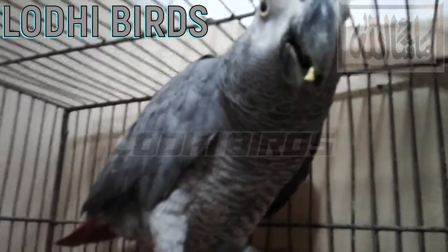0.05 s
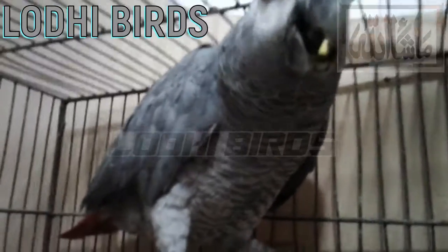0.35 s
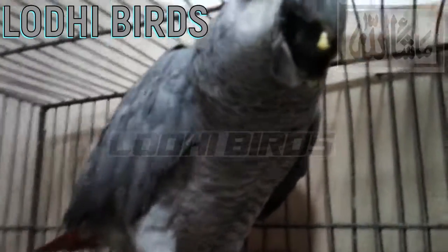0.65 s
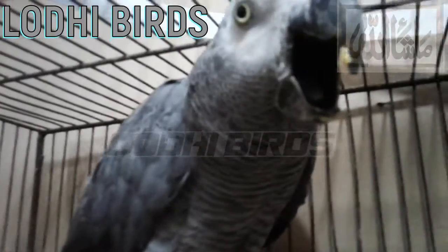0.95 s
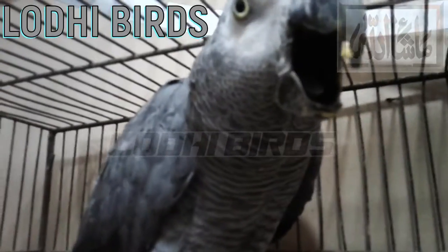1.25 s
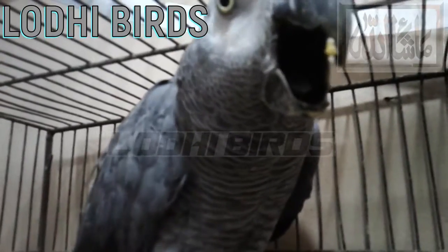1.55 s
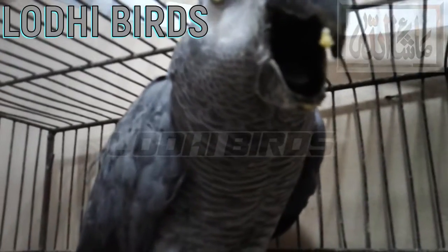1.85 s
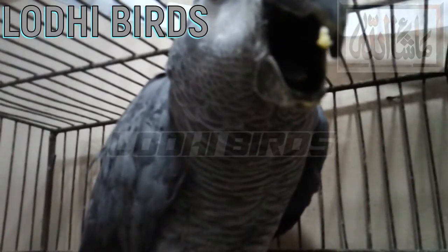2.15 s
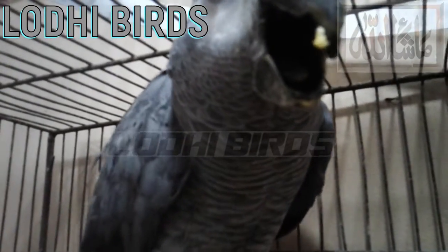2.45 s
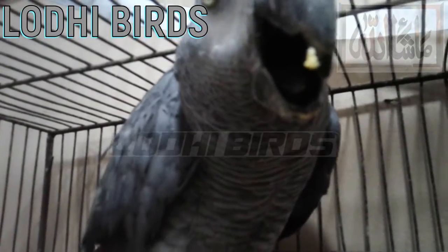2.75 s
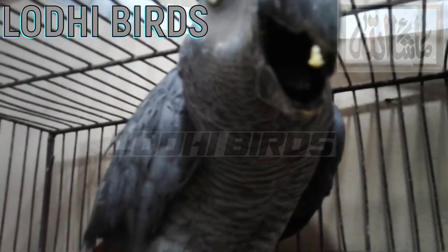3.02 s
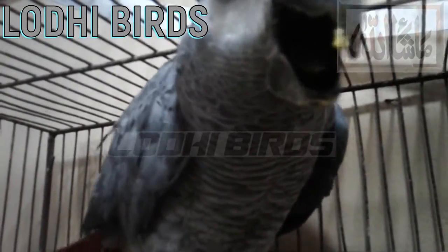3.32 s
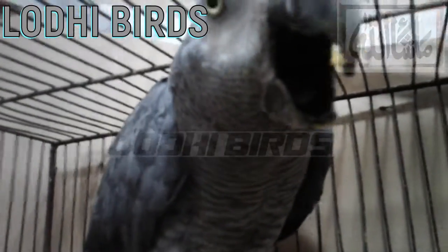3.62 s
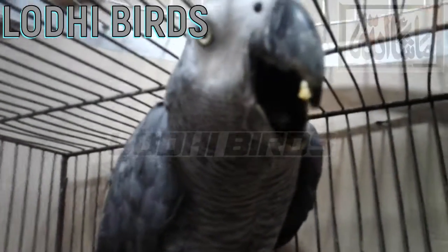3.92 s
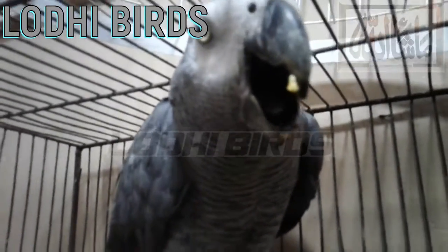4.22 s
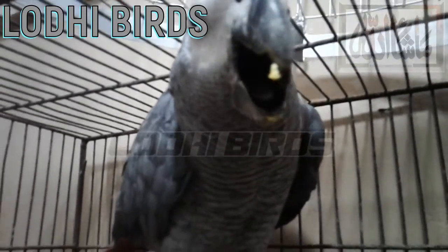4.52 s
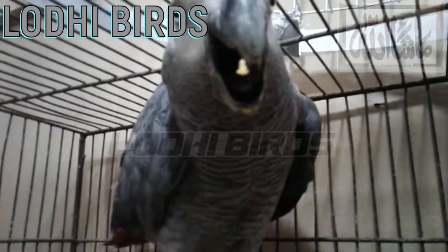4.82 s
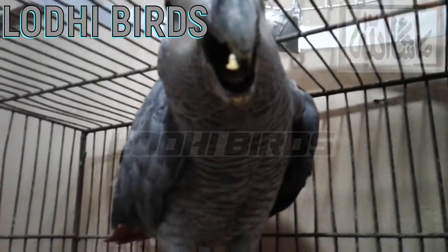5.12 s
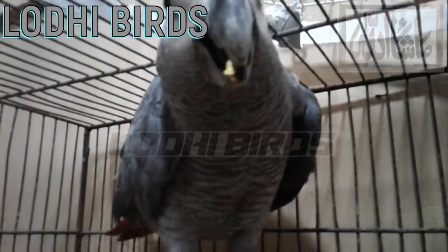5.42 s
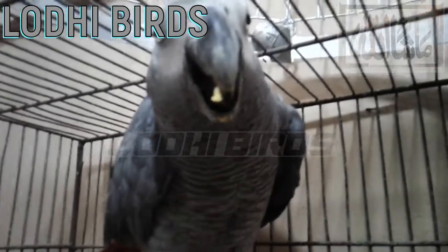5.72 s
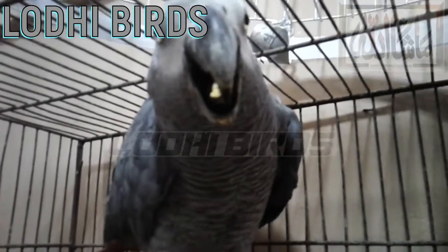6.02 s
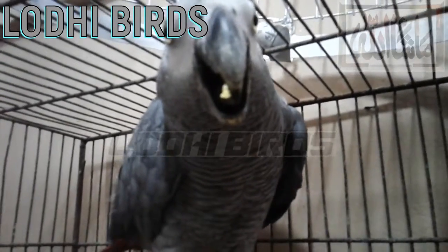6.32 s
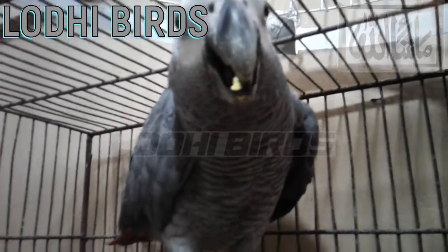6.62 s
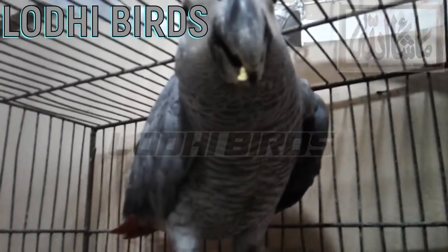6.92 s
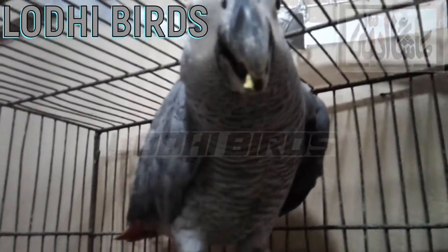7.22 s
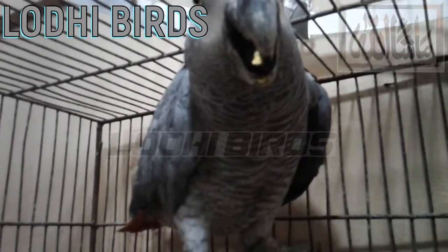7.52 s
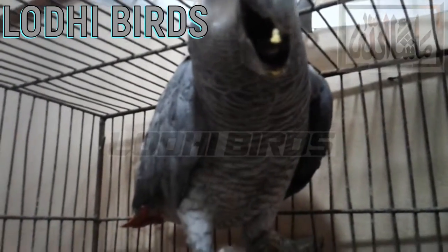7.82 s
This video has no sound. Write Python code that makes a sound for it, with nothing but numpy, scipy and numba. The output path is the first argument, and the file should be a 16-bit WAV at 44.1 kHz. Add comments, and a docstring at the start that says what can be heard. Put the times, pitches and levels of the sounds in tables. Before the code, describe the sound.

A parrot growls close by in four harsh, rasping stretches, with low rattles and small birds squeaking in the gaps.

```python
"""A fan hums in a small hard-walled room; small birds peep, squeal and rasp over a dull rattle.
Room noise and fan hum start louder, then drop as the recorder's gain ducks at 0.8 s.
At 0.9 s a grey parrot growls close by: uneven slaps of its syrinx ring its throat and open beak.
The growl surges once, sags and gives way at 3.2 s to the slow slaps of the rattle and more bird calls.
Three shorter growls follow at 3.5, 5.7 and 7.3 s. A limiter holds the peaks throughout."""
import sys
import numpy as np
from scipy import signal
from scipy.fft import rfft, irfft
from scipy.io import wavfile
from scipy.ndimage import uniform_filter1d, minimum_filter1d
from numba import njit

SR = 44100
rng = np.random.default_rng(int(sys.argv[2]) if len(sys.argv) > 2 else 0)


def transcribe(u):
    """Save the signal u as a 16-bit wav file named by the first command-line argument.

    u: samples, shape (n,) or (channels, n), limited to [-1, 1]; the rate is SR.
    q: integer samples, one column per channel.
    """
    v = np.clip(np.atleast_2d(u).T, -1, 1)
    q = np.round(v * 32767).astype(np.int16)
    wavfile.write(sys.argv[1], SR, q)


N = 346626
T = np.arange(N) / SR
TOP_HZ = 15800

# Room noise. Each row: frequency in Hz, relative spectral density in dB.
AIR_SPECTRUM = [(30, -19), (65, -4), (150, -2.5), (400, 3.5), (750, 0.5), (1500, -3), (5000, -13.5),
                (9000, -6), (13000, -17)]
# Extra room noise and fan hum before the recorder's gain ducks.
# Each row: start in seconds, end in seconds, level in dB.
BEFORE_GAIN_DUCK = [(0.0, 0.79, -32.5)]
# Deep thrums. Each row: start in seconds, end in seconds, level in dB.
DEEP_THRUMS = [(5.26, 5.42, -58), (6.8, 7.72, -58.5)]
# Small birds' noise resonances. Each row: centre in Hz, width in Hz, gain in dB.
RASP_MODES = [(4200, 140, 34), (6330, 4500, 4), (8160, 1600, 35), (8500, 1000, 3), (10800, 1500, -68)]
# Scolds. Each row: start in seconds, length in seconds, relative level in dB, factor on the resonances.
BIRD_RASPS = [(0.627, 0.075, -29.5, 0.3), (3.339, 0.17, -30.5, 0.88), (6.736, 0.068, -27, 0.63),
              (6.772, 0.13, -21.5, 1), (7.103, 0.047, -45, 0.399), (7.255, 0.11, -22, 0.95),
              (7.42, 0.11, -19.5, 0.96)]
# Thin peeps. Each row: start in seconds, middle pitch in Hz, glide in Hz, relative level in dB.
BIRD_PEEPS = [(0.002, 3280, -4, -29), (0.002, 2770, -60, -35), (3.369, 3050, -300, -34),
              (5.309, 3530, -71, -29.5), (5.422, 3690, 0, -27.5), (5.742, 3020, 250, -37),
              (6.581, 3400, -150, -32), (6.903, 1520, -300, -39.5), (6.929, 3630, 54, -27),
              (7.052, 2520, -750, -34.5), (7.055, 3620, -50, -28), (7.102, 3050, -500, -31),
              (7.113, 1900, 57, -39), (7.166, 2500, -250, -35.5), (7.18, 3600, -270, -30),
              (7.305, 3680, -300, -28)]
# Shrill squeals. Each row: start in seconds, length in seconds, start, middle and end pitch in Hz,
# relative level in dB, second harmonic in dB re the fundamental.
BIRD_SQUEALS = [(0.101, 0.065, 2916, 3416, 2660, -21, 0), (0.384, 0.084, 2280, 3275, 2690, -28.5, 0.5),
                (0.442, 0.028, 2590, 2320, 2200, -26, -11), (0.786, 0.021, 4260, 4100, 4230, -22.5, 1.5),
                (0.803, 0.026, 2847, 2486, 2330, -8, 18), (0.813, 0.063, 2328, 2730, 2780, -14, 13.5),
                (0.874, 0.049, 5180, 5340, 5460, -17, -12.5), (1.045, .06, 2420, 2465, 2660, -21.5, 1),
                (1.1, 0.044, 3066, 3110, 3210, -22, 22), (3.426, 0.057, 3240, 3126, 3170, -25, 2.5),
                (3.485, 0.028, 2479, 2480, 2723, -34, 8), (5.097, .05, 3386, 3200, 3000, -26.5, -2),
                (5.514, 0.073, 4590, 4140, 4120, -19.5, -7.5), (5.523, 0.023, 2530, 3090, 3360, -20.5, 3.5),
                (5.56, 0.024, 3040, 3090, 3140, -23, 20), (5.589, 0.028, 3760, 3570, 3620, -15.5, -15),
                (5.604, 0.075, 2930, 2876, 2510, -29.5, 32), (5.642, 0.0296, 3210, 3660, 3410, -24, -21),
                (7.489, 0.019, 4660, 4620, 4340, -30, 0), (7.516, 0.065, 4270, 4180, 4223, -19, -5),
                (7.594, 0.058, 3770, 3505, 3800, -21, -11.5)]
# Parrot's slack throat resonances. Each row: centre in Hz, width in Hz, gain in dB.
SLACK_MODES = [(335, 65, 0.5), (745, 57, -12), (945, 510, 12), (1340, 130, -33)]
# Slow rattles. Each row: start in seconds, end in seconds, level in dB, slap rate in Hz.
SLACK_RATTLES = [(0.15, 0.62, -27, 105), (0.66, 0.81, -32, 104), (3.19, 3.54, -29, 96),
                 (5.22, 5.53, -36, 62), (5.53, 5.8, -39, 60), (6.87, 7.1, -35, 84),
                 (7.25, 7.54, -28.5, 115)]
# Single hard slaps. Each row: time in seconds, relative strength in dB.
HARD_SLAPS = [(0.214, -4), (0.296, -8), (0.302, -8), (0.32, -3), (0.38, -4.5), (0.388, 0.5), (0.476, -4),
              (0.509, -2.5), (0.603, -5), (0.637, -1), (0.652, -6), (0.681, -3), (0.748, -7.5), (0.771, -5),
              (3.228, -5), (3.271, -7), (3.318, -12), (3.331, -4.5), (3.376, -8), (5.423, -16),
              (5.457, -13), (5.475, -12), (5.504, -13), (6.846, -10)]
# Chest resonances. Each row: centre in Hz, width in Hz, gain in dB.
CHEST_MODES = [(218, 55, -3.8), (340, 110, 0), (432, 70, -3), (560, 200, -1)]
# Throat and beak resonances in three bands. Each row: centre in Hz, width in Hz, gain in dB.
LOW_MODES = [(1093, 76, 5.5), (1216, 112, 5.5), (1428, 325, -1.5), (2015, 275, 1.5), (2077, 34, 5.5),
             (2460, 470, -3), (2775, 130, -1)]
MID_MODES = [(3114, 350, 0.5), (3398, 172, 4), (4240, 450, -2), (4770, 100, -10)]
TOP_MODES = [(5670, 1600, -9), (6770, 560, -2), (8440, 730, 2), (9180, 510, -4.5), (9870, 1000, -12.5),
             (12020, 1160, -15.5), (14900, 1500, -18.5)]
# Growls. Each row: start and end in seconds, base effort in dB, brightness in dB, mid-band boost in dB,
# initial beak closure from 0 to 1, beak opening and rate settling times in seconds, throat resonance
# in Hz, surge time and half-width in seconds, surge in dB.
PARROT_GROWLS = [(0.9, 3.177, -13.5, -5.5, 0.06, 0.32, 0.13, .2, 2074, 1.65, .5, 3.5),
                 (3.508, 5.247, -14, -4.8, 1, 0.29, 0.094, .62, 2034, 3.92, .3, 6),
                 (5.724, 6.714, -17, -7, 2.2, 0.53, 0.12, .17, 2010, 5.92, .15, 1.5),
                 (7.272, 8.302, -17.5, -5, 0, 1, 0.21, 0.11, 2000, 7.85, 0.21, 2.6)]


def undb(db):
    """Decibels to gain."""
    return 10 ** (np.asarray(db) / 20)


def unit(x):
    """Scale to rms 1."""
    return x / np.sqrt(np.mean(x ** 2) + 1e-18)


def steady(x):
    """Hold the running rms near 1."""
    size = SR // 12
    power = np.abs(uniform_filter1d(uniform_filter1d(x * x, size), size))
    return x / np.sqrt(power + 1e-3 * np.mean(x * x))


def curve(table, column):
    """One column, interpolated over time."""
    rows = np.array(table)
    return np.interp(T, rows[:, 0], rows[:, column])


def spells(table, fade_s):
    """Gain that fades in, holds and fades out for each row."""
    return sum(undb(db) * np.clip(np.minimum(T - start_s, end_s - T) / fade_s + .5, 0, 1)
               for start_s, end_s, db, *_ in table)


def walk(rate_hz, size=N):
    """Random drift with rate_hz knots a second."""
    knots = rng.standard_normal(N // 8)
    return 1.2 * np.interp(np.arange(size) * rate_hz / SR, np.arange(len(knots)), knots)


def add(out, start_s, sound):
    """Mix a sound in at start_s."""
    i = int(start_s * SR)
    out[i:i + len(sound)] += sound[:N - i]


def cut(x, hz, kind, order=2):
    """Butterworth low- or high-pass."""
    return signal.sosfilt(signal.butter(order, hz, kind, fs=SR, output="sos"), x)


def band(x, low_hz, high_hz):
    """High-pass, then low-pass."""
    return cut(cut(x, low_hz, "high"), high_hz, "low")


@njit
def svf(x, hz, k):
    """State-variable band-pass with a moving centre; k is width over centre."""
    y, band_state, low_state = np.empty(len(x)), 0., 0.
    for i in range(len(x)):
        g = np.tan(np.pi * min(hz[i] / SR, .45))
        v = (band_state + g * (x[i] + 1e-18 - low_state)) / (1 + g * (g + k))
        band_state = 2 * v - band_state
        low_state += 2 * g * v
        y[i] = k * v
    return y


def ring(x, modes, scale=np.ones(N), order=1):
    """Parallel resonances, shifted by scale; order 2 steepens the skirts."""
    out = 0
    for hz, width_hz, db in modes:
        y = x
        for _ in range(order):
            y = svf(y, hz * scale, width_hz / hz)
        out = out + undb(db) * y
    return out


def beats(rate_hz, jitter_s):
    """Sample indices of jittered pulses at a moving rate."""
    at = np.flatnonzero(np.diff(np.floor(np.cumsum(rate_hz) / SR)))
    jitter = jitter_s * SR * rng.standard_normal(N // 64)[:len(at)]
    return np.clip(at + jitter.astype(int), 0, N - 1)


def clicks(at, db):
    """Single-sample pulses."""
    return np.bincount(at, undb(db), N)[:N]


def scatter(at):
    """One bounded random number per pulse."""
    return np.clip(rng.standard_normal(N // 64)[:len(at)], -2, 1.5)


def room(x, t60_s, treble_t60_s):
    """Dense wall echoes after 3 ms; the treble dies sooner."""
    t = T[:SR // 2]
    noise = rng.standard_normal(len(t))
    dull = cut(noise, 4000, "low", order=1)
    tail = (dull * undb(-60 * t / t60_s) + (noise - dull) * undb(-60 * t / treble_t60_s)) * (t > .003)
    return signal.fftconvolve(x, tail / np.sqrt(np.sum(tail ** 2)))[:N]


def fan_and_rumble(floor_db=-41, fan_hz=145.8, fan_re_air_db=-18.5, thrum_hz=70.4):
    """Room noise and fan hum drop as the recorder's gain ducks at 0.8 s; a deep thrum comes and goes."""
    hz, db = np.transpose(AIR_SPECTRUM)
    bins_hz = np.arange(N // 2 + 1) * SR / N
    colour = undb(np.interp(np.log(bins_hz + 1), np.log(hz), db))
    air = unit(cut(irfft(rfft(rng.standard_normal(N)) * colour, N), 65, "high", order=5))
    hum = undb(fan_re_air_db + 2 * walk(14)) * unit(np.sin(2 * np.pi * fan_hz * T))
    thrum = spells(DEEP_THRUMS, fade_s=.12) * unit(np.sin(2 * np.pi * thrum_hz * T))
    gain = undb(floor_db) + spells(BEFORE_GAIN_DUCK, fade_s=.11)
    return (air * undb(walk(24)) + hum) * gain + thrum


def rasps(grain_db=3):
    """Hoarse scolds: fluttering noise through wavering resonances."""
    gain = np.zeros(N)
    for start_s, length_s, db, _ in BIRD_RASPS:
        add(gain, start_s, undb(db) * signal.windows.tukey(int(length_s * SR), .61))
    register = curve(BIRD_RASPS, 3) * (1 + .14 * walk(68))
    breath = rng.standard_normal(N) * undb(grain_db * walk(500))
    return gain * unit(band(ring(breath, RASP_MODES, register), 1700, 8800))


def chirps(peep_s=.0522, peep_dip=.013, peep_second_db=-12.5, flutter_db=3, shrill_per_db=.24):
    """Squeals and peeps: arched, quavering whistles with a little hiss; louder is shriller."""
    out = np.zeros(N)
    hiss = undb(-21) * unit(cut(ring(rng.standard_normal(N), RASP_MODES), 15000, "low"))
    squeal_edge, peep_edge = .11, .24  # share of the note spent fading in and out
    notes = [(*row, squeal_edge) for row in BIRD_SQUEALS]
    for start_s, hz, glide_hz, db in BIRD_PEEPS:
        ends_hz = hz * (1 - peep_dip)
        pitches_hz = ends_hz - glide_hz / 2, hz, ends_hz + glide_hz / 2
        notes.append((start_s, peep_s, *pitches_hz, db, peep_second_db, peep_edge))
    for start_s, length_s, start_hz, middle_hz, end_hz, db, second_db, edge in notes:
        size = int(length_s * SR)
        arch = np.polyfit([0, .5, 1], [start_hz, middle_hz, end_hz], 2)
        pitch_hz = np.polyval(arch, np.linspace(0, 1, size)) * (1 + .018 * walk(900, size))
        phase = 2 * np.pi * np.cumsum(pitch_hz) / SR
        tone = np.sin(phase)
        for k in range(2, 7):
            upper_db = -3 - 8 * (k - 3) + shrill_per_db * (db + 29) if k > 2 else 0
            if k * middle_hz < TOP_HZ:
                tone += undb(second_db + upper_db + flutter_db * walk(190, size)) * np.sin(k * phase)
        ragged = 1 + .35 * walk(1500, size)
        sound = cut(unit(tone) * ragged, 13100, "low") + np.roll(hiss, int(start_s * SR))[:size]
        envelope = signal.windows.tukey(size, edge) * undb(flutter_db * walk(162, size))
        add(out, start_s, undb(db) * unit(sound * envelope))
    return out


def rattle(effort_db, spread_db=6.5, idle_db=-46, under_growl_db=-21, hard_peak_db=-3.5):
    """The slack syrinx flaps slowly and unevenly into a nearly closed throat, never quite at rest."""
    def throat(x):
        return cut(cut(ring(x, SLACK_MODES), 1650, "low", order=4), 125, "high")
    at = beats(curve(SLACK_RATTLES, 3), jitter_s=.0016)
    floor = undb(idle_db) + undb(effort_db + under_growl_db)
    gain = undb(-1) * np.maximum(spells(SLACK_RATTLES, fade_s=.029), floor)
    flaps = gain * steady(throat(clicks(at, spread_db * scatter(at))))
    slap_s, slap_db = np.transpose(HARD_SLAPS)
    hard = throat(clicks((slap_s * SR).astype(int), slap_db))
    return flaps + hard / np.abs(hard).max() * undb(hard_peak_db)


def growl_gestures(attack_s=.035, release_s=.011, sag_db_per_s=1, tire_s=.07, tire_db=-5, slap_hz=213):
    """Control curves: each growl opens the beak, surges once, sags and tires."""
    rows = np.array(PARROT_GROWLS)
    current = np.maximum(np.searchsorted(rows[:, 0], T) - 1, 0)
    (start_s, end_s, base_db, open_bright_db, boost_db, closure, open_s, settle_s,
     base_hz, surge_s, width_s, surge_db) = rows[current].T
    age_s = T - start_s
    shut = closure * np.exp(-(age_s / open_s) ** 2)
    fresh = np.exp(-(age_s / settle_s) ** 2)
    surge = np.exp(-((T - surge_s) / width_s) ** 2)
    tired = np.exp(np.minimum(T - end_s, 0) / tire_s)
    gate = np.clip(age_s / attack_s, 0, 1) * np.exp(-np.maximum(T - end_s, 0) / release_s)
    push_db = surge_db * surge - sag_db_per_s * age_s + tire_db * tired
    # Harder push: brighter, faster, higher. Shut beak: quieter, duller, lower.
    effort_db = base_db + push_db - 14 * shut + 20 * np.log10(gate + 1e-6)
    bright_db = open_bright_db + .1 * push_db - 21 * shut
    rate_hz = slap_hz + 1.21 * push_db + 11.5 * fresh - 10 * tired
    throat_hz = (base_hz + 9 * push_db) * (1 - .12 * shut)
    return effort_db, bright_db, boost_db, rate_hz, throat_hz


def growl(effort_db, bright_db, boost_db, rate_hz, throat_hz, rest_hz=2080, puff_s=.0011):
    """Uneven slaps of the syrinx, each with a puff of air, ring throat, beak and chest."""
    drive_db = np.clip(effort_db + 15, -10, 6)
    scale = throat_hz / rest_hz * (1 + .003 * walk(30))
    at = beats(rate_hz * (1 + .01 * walk(30)), jitter_s=.00025)
    force_db = -4 * rng.exponential(size=N // 64)[:len(at)]  # some slaps fail to close fully
    snap_db = 4 * scatter(at)  # sharper closure, more treble

    def source(db, air):
        """Slaps and puffs; harder blowing is more turbulent."""
        slaps = clicks(at, db)
        puffs = signal.lfilter([1], [1, -np.exp(-1 / (puff_s * SR))], slaps + 1e-12)
        return slaps + air * undb(.7 * drive_db) * puffs * rng.standard_normal(N)
    full = source(force_db, air=.015)
    sharp = source(force_db + snap_db, air=.09)
    medium = source(force_db + snap_db / 2, air=.09)
    low = steady(cut(cut(ring(full, LOW_MODES, scale), 1040, "high", order=3), 2870, "low"))
    mid = steady(band(ring(medium, MID_MODES, scale), 2250, 4200))
    top = steady(ring(sharp, TOP_MODES, scale ** 1.1, order=2))  # beak modes move furthest
    crack = steady(band(clicks(at, force_db + snap_db), 1250, 6000))
    chest = steady(cut(ring(clicks(at, force_db / 2), CHEST_MODES), 120, "high"))
    beak = undb(bright_db) * (undb(1 + boost_db) * mid + undb(-.5) * top + undb(-13) * crack)
    return undb(effort_db) * (undb(-1.5) * low + undb(-26 + 1.24 * drive_db) * chest + beak)


def scene():
    """Parrot close and fairly dry; small birds further off and wetter."""
    effort_db, bright_db, boost_db, rate_hz, throat_hz = growl_gestures()
    parrot = growl(effort_db, bright_db, boost_db, rate_hz, throat_hz) + rattle(effort_db)
    birds = chirps() + rasps()
    near = parrot + undb(-8.5) * room(parrot, t60_s=.36, treble_t60_s=.12)
    far = undb(3) * birds + undb(1) * room(birds, t60_s=.32, treble_t60_s=.17)
    return (near + far + fan_and_rumble())[None]


def record(dry, ceiling=.84):
    """Fast look-ahead limiter; deepest bass and top cut."""
    size = SR // 700
    gain = np.minimum(1, ceiling / (np.abs(dry) + 1e-9))
    limited = dry * uniform_filter1d(minimum_filter1d(gain, size), size)
    trimmed = cut(limited, 50, "high", order=4)
    return signal.fftconvolve(trimmed, signal.firwin(401, TOP_HZ, fs=SR)[None], mode="same")


dry = scene()
out = record(dry)
transcribe(out)
```